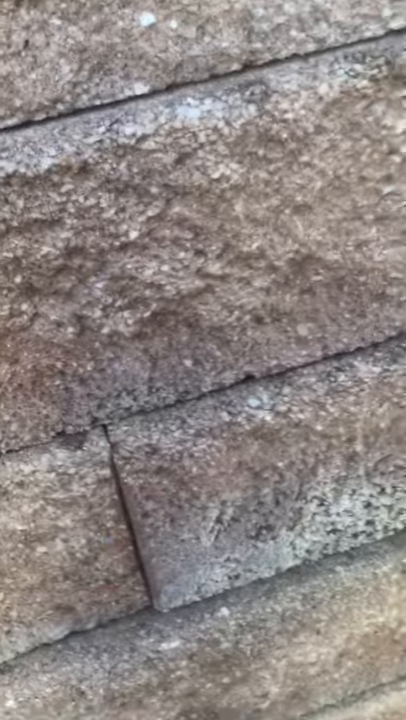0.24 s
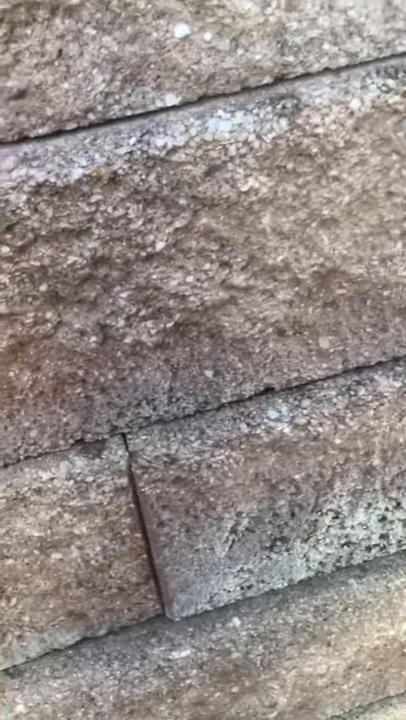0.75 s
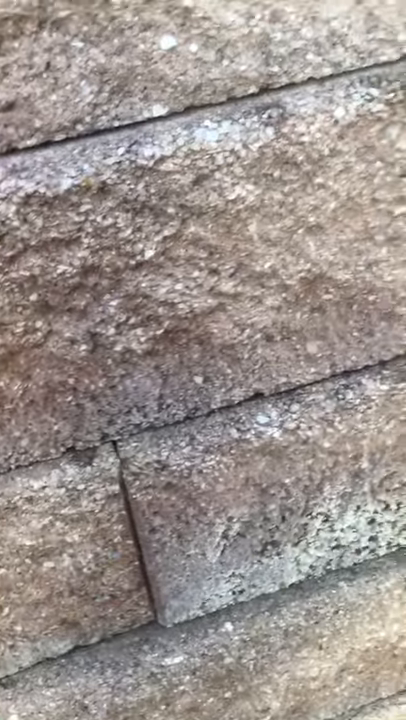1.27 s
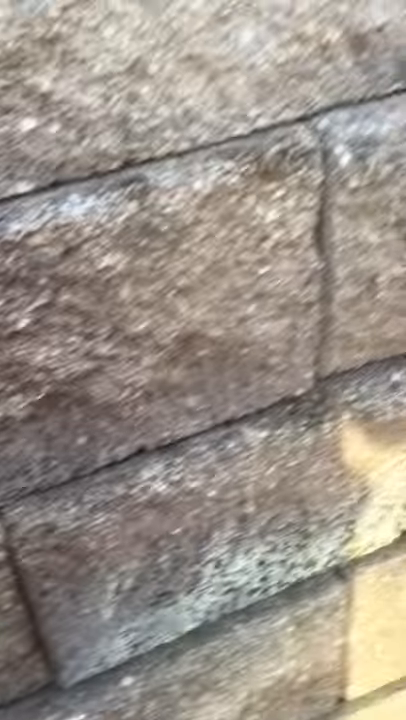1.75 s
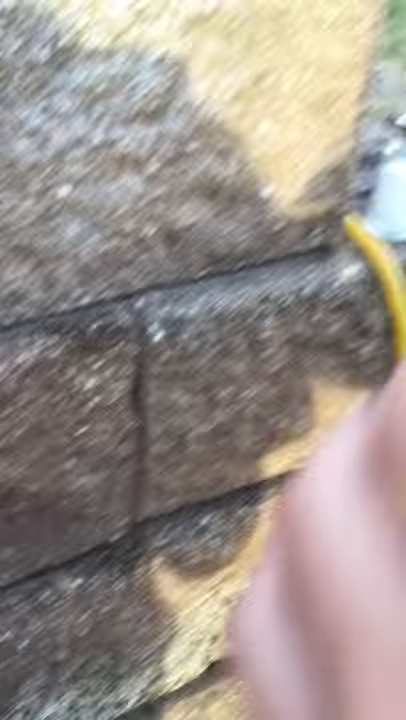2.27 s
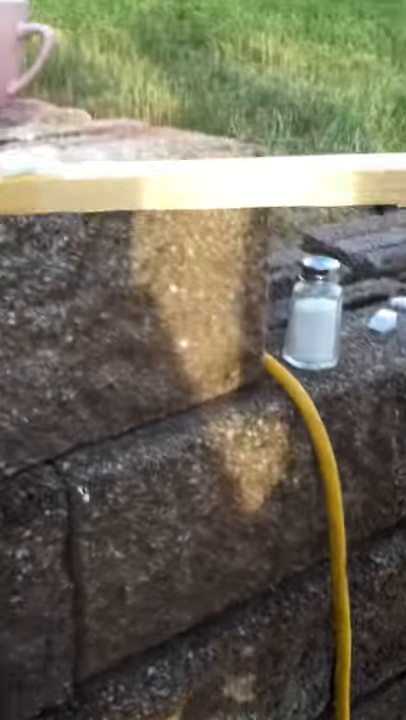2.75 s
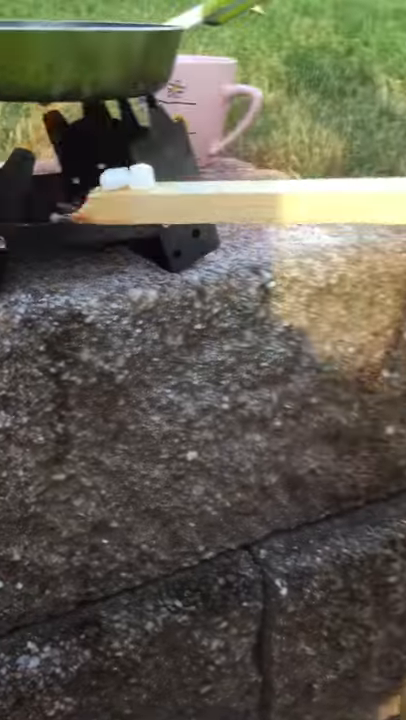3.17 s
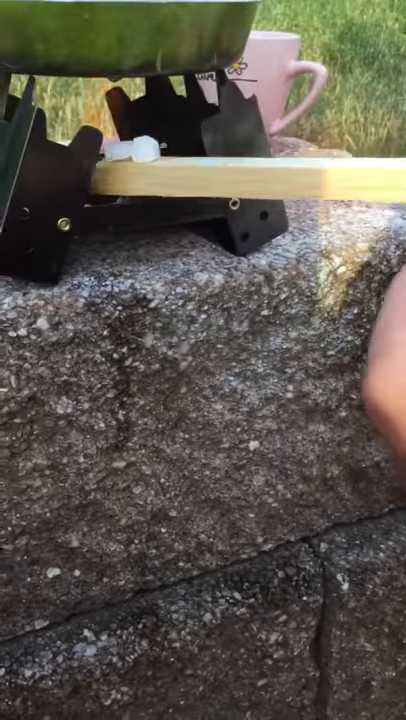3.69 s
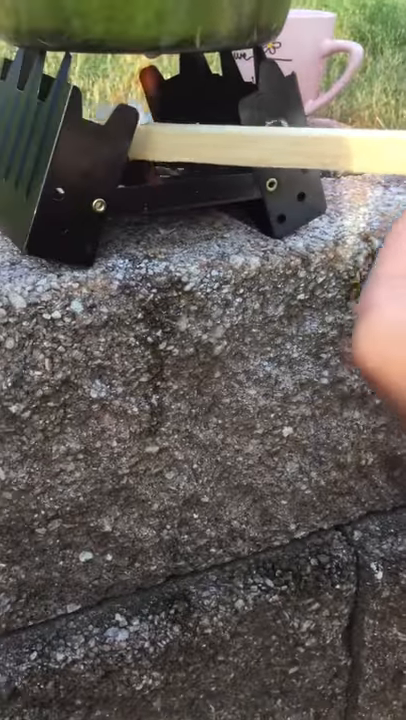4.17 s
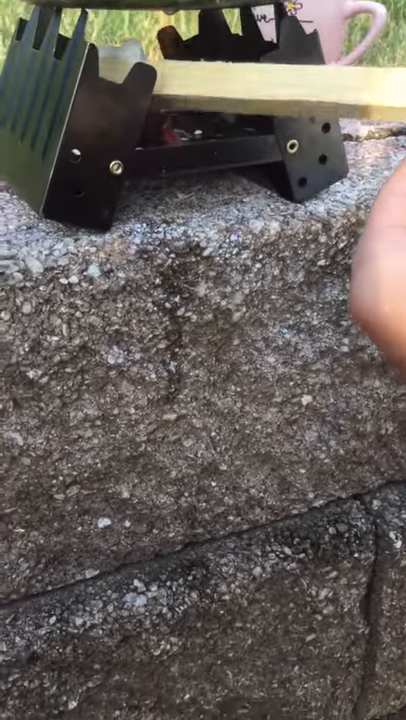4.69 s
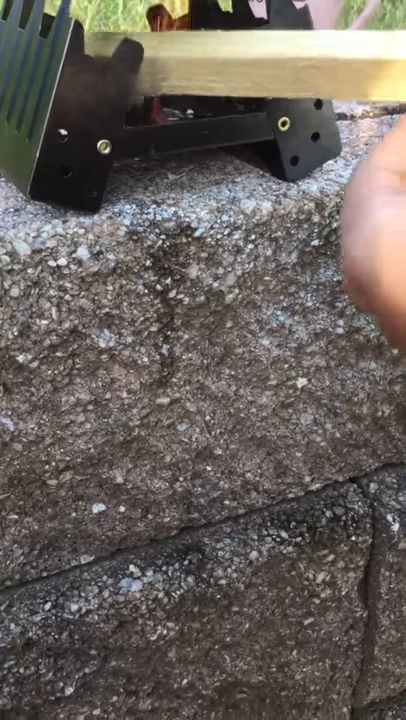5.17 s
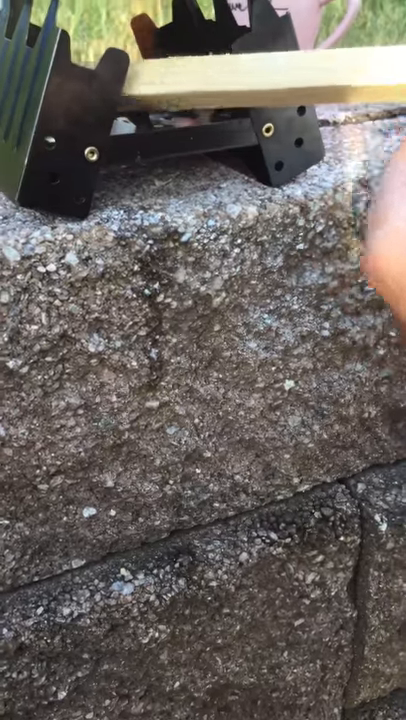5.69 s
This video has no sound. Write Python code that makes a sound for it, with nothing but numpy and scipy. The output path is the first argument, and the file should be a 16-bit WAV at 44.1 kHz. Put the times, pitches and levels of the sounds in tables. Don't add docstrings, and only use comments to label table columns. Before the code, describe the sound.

A quiet garden picked up by a phone, thin in the bass and with its faint treble muted. A soft, low rumble of far traffic continues throughout, with a very faint whine near 1.3 kHz that weakens after 2.5 s. In the first two seconds there are only tiny dry ticks and faint, drawn-out bird whistles and pips; clearer bird notes come around 1.5 and 2 to 2.6 s. At 2.66 s one sharp, short click stands out, followed by small ticks. From 3.8 to 4.3 s a wooden stick lightly scrapes and taps thin sheet steel, while a bird gives several high falling chips at 4.1 to 4.4 s. After a lull, the loudest event comes at 5.24 to 5.36 s: a rapid clatter of bright, short-ringing steel knocks. Brief rubbing and weaker taps follow until 5.7 s, then tiny high ticks at 5.8 s end the quiet scene.

```python
import sys
import numpy as np
from scipy import signal
from scipy.fft import rfft, irfft
from scipy.io import wavfile
from scipy.ndimage import uniform_filter1d

SR = 44100
rng = np.random.default_rng(int(sys.argv[2]) if len(sys.argv) > 2 else 0)


def ratio(d):
    e = np.asarray(d, float) / 20
    return 10 ** e


def store_pcm(level_fs):
    pcm = np.round(np.clip(level_fs, -1, 1) * 32767).astype(np.int16)
    wavfile.write(sys.argv[1], SR, np.atleast_2d(pcm).T)


N = 261513

# t/s, level/dB
WASH_LEVEL = [(0, -73), (.35, -67), (.8, -71.5), (1.5, -70.5), (2.2, -71.5), (2.55, -66.5), (2.95, -69),
              (3.75, -69.5), (4.5, -70.5), (5.2, -73), (5.93, -69.5)]
# f/Hz, level/dB per Hz
RUMBLE_SPECTRUM = [(15, -68), (25, -56), (64, -34), (73, -29), (87, -14), (134, -7), (190, -1), (289, -7.5),
                   (409, -24.5), (480, -20.5), (620, -57.5), (1060, -120)]
WASH_SPECTRUM = [(300, -4), (480, -15), (628, -11), (867, -18), (1320, -19), (1600, -25), (2300, -38.5),
                 (4000, -46), (15000, -58)]
# t/s, level/dB
WHINE_LEVEL = [
    (0, -74),
    (2.2, -75),
    (2.7, -82),
    (5.93, -82),
]
RUMBLE_DB, WHINE_HZ = -52.5, 1280

# t/s, first f/Hz, last f/Hz, level/dB
CHIPS = [
    (2.061, 3066, 1976, -67),
    (3.717, 3600, 3270, -82),
    (4.13, 4470, 3450, -65.5),
    (4.129, 3250, 2540, -71.5),
    (4.249, 4330, 3470, -62.5),
    (4.361, 4370, 3190, -64.5),
    (4.368, 5400, 4500, -81),
    (4.807, 3650, 3240, -74),
    (4.84, 3130, 2970, -86),
    (4.893, 2360, 2320, -86),
]
# t/s, first f/Hz, last f/Hz, level/dB
PIPS = [(.6, 3390, 3290, -84), (1.434, 2480, 2660, -72), (1.53, 3330, 3080, -81.5),
        (1.974, 2330, 2280, -73), (2.148, 1910, 2100, -77), (2.177, 2460, 2500, -70.5),
        (2.572, 2420, 2710, -71), (2.62, 2030, 2400, -71), (4.266, 2370, 2186, -70.5),
        (4.56, 2850, 3470, -78.5), (4.775, 2090, 2120, -86.5), (5.003, 2210, 2215, -87)]
# t/s, length/s, first f/Hz, last f/Hz, level/dB
WHISTLES = [(0, .12, 3030, 3000, -82), (.013, 0.18, 2530, 2390, -86), (.33, 0.14, 2700, 2880, -84.5),
            (0.436, 0.12, 3510, 3250, -82.5), (0.466, 0.12, 2490, 2180, -74.5),
            (.348, 0.13, 5480, 5500, -88), (0.366, .14, 3990, 4090, -89), (.554, 0.11, 5560, 5460, -90.5),
            (.364, 0.16, 8040, 7630, -96.5), (.6, .14, 2380, 2070, -89), (1.999, 0.1, 2710, 2683, -70.5),
            (2.762, 0.037, 2250, 2104, -70), (0.428, 0.11, 4200, 4000, -90), (0.342, 0.06, 6600, 6700, -92),
            (2.361, 0.11, 2680, 2600, -87), (3.36, .065, 3200, 3450, -79), (3.72, 0.087, 1900, 1980, -84.5),
            (4.411, 0.076, 2320, 2420, -82), (4.477, 0.15, 2570, 2980, -85.5),
            (4.659, 0.095, 3000, 2840, -83.5), (4.719, 0.16, 2530, 2404, -79.5),
            (5.019, .093, 3060, 2570, -88)]
# t/s, end f/Hz, top f/Hz, level/dB
ARCHES = [
    (0.383, 2690, 2890, -79.5),
    (1.467, 2040, 2490, -72),
    (2.225, 2700, 2790, -89),
]
CHIP_S, PIP_S, ARCH_S = .038, .044, 0.19

# t/s, peak level/dB, lowest f/Hz, highest f/Hz, t60/s
TICKS = [(.027, -57, 12600, 16200, 0.03), (0.264, -62, 8500, 16000, 0.022), (.405, -63, 9500, 11200, 0.029),
         (0.566, -56.5, 11200, 16200, 0.023), (1.743, -65, 1510, 9400, 0.15), (2.0, -60, 5040, 14000, .02),
         (2.394, -63, 1600, 5900, 0.077), (2.532, -57.5, 1780, 4900, 0.042),
         (2.595, -47, 8100, 16000, 0.03), (2.6603, -26.5, 1830, 10900, 0.031),
         (2.929, -47.5, 4360, 15500, 0.043), (3.038, -62.5, 10500, 16000, 0.042),
         (3.295, -64.5, 3500, 7800, 0.13), (3.41, -60, 4000, 16200, 0.038),
         (3.551, -58.5, 7000, 16000, 0.038), (3.572, -55, 9800, 15800, 0.019),
         (5.225, -40, 2490, 12000, 0.027), (5.74, -58, 10700, 16000, 0.026),
         (5.777, -57.5, 11300, 16000, 0.023), (5.789, -47, 11000, 15700, 0.026),
         (5.815, -50, 330, 480, 0.089), (5.826, -48, 11900, 15900, 0.019),
         (5.812, -53, 11600, 15900, 0.018)]
# t/s, length/s, level/dB, bright share over dull/dB
RUBS = [(2.567, .03, -76.5, 1), (2.657, .004, -58.5, -3), (2.687, 0.088, -85, 22),
        (3.831, 0.013, -54.5, 5.5), (3.916, 0.017, -60.5, 7.5), (3.964, 0.046, -67, 5),
        (2.39, 0.075, -90, -15), (2.52, 0.043, -79, -8), (4.115, .03, -72, 3.5), (4.159, 0.012, -57.5, 2),
        (4.244, .045, -65, -6), (5.099, 0.047, -65.5, 2.5), (5.203, 0.027, -70, 3.5),
        (5.399, 0.058, -54, -1.5), (5.482, 0.036, -53, -5), (5.678, 0.0089, -61.5, 1),
        (5.706, 0.017, -65.5, -1), (5.863, 0.012, -76, 6), (5.9, 0.034, -92, 17)]
RUB_RISE_DB_PER_S, RUB_FALL_DB_PER_S = 905, 399.5

# f/Hz, level/dB, t60/s
STEEL_MODES = [(567, -33, 0.18), (1205, -23.5, 0.28), (1338, -6.5, 0.15), (1587, 2.5, 0.13),
               (1790, -24.5, 0.055), (2370, -13, 0.07), (2200, -1, 0.17), (2204, -17, 0.12),
               (2390, -9.5, 0.17), (2732, 0.5, 0.094), (3105, -2.5, 0.091), (3500, 0, 0.043),
               (3499, -6.5, 0.27), (3770, -5, 0.22), (4110, -7.5, 0.15), (4380, -11.5, 0.21),
               (4860, -1, 0.11), (5493, -6, 0.14), (6450, -22.5, 0.082), (7450, -14, 0.19),
               (6660, -2.5, 0.19), (7290, -3, 0.3), (7990, -7, 0.25), (8660, -4, 0.36), (9170, -4.5, 0.064),
               (10200, -15, 0.27), (11350, -21.5, 0.042), (11420, -12.5, 0.18), (12540, -20, 0.049),
               (13820, -17.5, 0.072)]
# t/s, level/dB, hardness as tilt to the high modes/dB, ring share/1
EDGE_KNOCKS = [(3.8224, -57.5, 8.5, 1), (3.8513, -51, 3, 1), (3.929, -52.5, 3.5, 1), (4.0108, -60, 7, 1),
               (4.1484, -65, 4, 0.9), (4.1612, -51.5, 8, 0.98), (4.2994, -55.5, 4, 0.59),
               (5.1033, -61.5, 12.5, 1), (5.2398, -20.5, 2.8, 0.5), (5.3542, -24.5, 6.5, 0.58),
               (5.5124, -49, -8, 1), (5.7064, -51.5, 5.5, 0.6), (5.85, -65.5, 16.5, 1),
               (5.884, -60.5, 2.5, 0.6)]
# t/s, level/dB, hardness/dB, ring share/1
FACE_KNOCKS = [(.027, -88.5, 15.5, 0.5), (.567, -83.5, 18, 0.32), (.841, -77.5, 16, 1.2),
               (2.087, -97, 19.5, 1), (5.2431, -34.5, -1.1, 1), (5.2736, -35, 0.6, 1),
               (5.3092, -38.5, 1.8, 1), (5.3584, -34, 4.5, 1), (5.4264, -50.5, 6.5, 0.9),
               (5.435, -44.5, 1.3, 1), (5.4834, -51.5, -6, .88), (5.677, -55.5, -0.5, 0.62)]
EDGE_MIDDLE_DB, FACE_MIDDLE_DB = 8.5, -3
SMALL_MODES_DB = 3.5

# f/Hz, level/dB per Hz
GATE_THRESHOLD = [(1200, -120), (1500, -108), (1900, -107), (3000, -111), (6000, -116), (15000, -121)]
HISS_DB = -92.5


def at_hz(points, hz):
    table_hz, value = np.transpose(points)
    return np.interp(np.log(hz), np.log(table_hz), value)


def in_time(rows):
    s, level = np.transpose(rows)
    return np.interp(np.arange(N) / SR, s, level)


def rms_one(x):
    return x / np.sqrt(np.mean(x ** 2) + 1e-20)


def band(x, low_hz, high_hz):
    sos = signal.butter(2, [low_hz, min(high_hz, .45 * SR)], "band", fs=SR, output="sos")
    return signal.sosfilt(sos, x)


def coloured(spectrum):
    hz = np.arange(N // 2 + 1) * SR / N + 1
    closed = [(spectrum[0][0] / 2, -90)] + list(spectrum) + [(spectrum[-1][0] * 2, -120)]
    white = rfft(rng.standard_normal(N))
    return rms_one(irfft(white * ratio(at_hz(closed, hz)), N))


def ring(clicks, hz, t60):
    r, w = ratio(-60 / (t60 * SR)), 2 * np.pi * hz / SR
    return signal.lfilter([0, np.sin(w)], [1, -2 * r * np.cos(w), r * r], clicks + 1e-18)


def far_traffic():
    rumble = ratio(RUMBLE_DB) * coloured(RUMBLE_SPECTRUM)
    wash = ratio(in_time(WASH_LEVEL) + 6) * coloured(WASH_SPECTRUM)
    whine = rms_one(ring(rng.standard_normal(N), WHINE_HZ, .5))
    return rumble + wash + ratio(in_time(WHINE_LEVEL)) * whine


def notes():
    straight = [(s, CHIP_S, *rest) for s, *rest in CHIPS]
    straight += [(s, PIP_S, *rest) for s, *rest in PIPS]
    straight += list(WHISTLES)
    glides = [(s, length, first, (first + last) / 2, last, db) for s, length, first, last, db in straight]
    arches = [(s, ARCH_S, end, top, end, db) for s, end, top, db in ARCHES]
    return glides + arches


def birds():
    out = np.zeros(N + SR)
    flutter = rms_one(band(rng.standard_normal(N + SR), 12, 70))
    for s, length, *glide_hz, db in notes():
        u = np.linspace(0, 1, int(length * SR))
        hz = np.polyval(np.polyfit([0, .5, 1], glide_hz, deg=2), u)
        i = int(s * SR)
        broken = np.clip((-67 - db) / 16, .1, .8)
        air = 1 - broken + broken * flutter[i:i + len(u)]
        level = ratio(db + 11.5) * np.sin(np.pi * u) ** .5 * air
        out[i:i + len(u)] += level * np.sin(2 * np.pi * np.cumsum(hz) / SR)
    t = np.arange(SR // 4) / SR
    echoes = rng.standard_normal(len(t)) * ratio(-60 * t / 0.3) * (t > .008)
    echoes /= np.sqrt(np.sum(echoes ** 2))
    return out[:N] + ratio(-9.0) * signal.fftconvolve(out, echoes)[:N]


def ticks():
    out, t = np.zeros(N + SR), np.arange(SR // 8) / SR
    noises = rng.standard_normal((len(TICKS), len(t)))
    for (s, db, low_hz, high_hz, t60), noise in zip(TICKS, noises):
        trail = ratio(-27.5 - 60 * t / 1.28)
        fall = (ratio(-60 * t / t60) + trail) * (1 - np.exp(-t / 0.00098))
        out[int(s * SR):][:len(t)] += ratio(db - 8.5) * fall * rms_one(band(noise, low_hz, high_hz))
    return out[:N]


def rub_grains():
    happens = rng.random(N) < 5000 / SR
    slips = ratio(2.3 * rng.exponential(1, N)) * rng.choice([-1, 1], N) * happens
    dull = rms_one(band(slips, 2400, 6800))
    bright = rms_one(band(slips, 7000, 18500))
    s, length, db, bright_db = np.transpose(RUBS)[:, :, None]
    t = np.arange(N) / SR
    rise_db = RUB_RISE_DB_PER_S * np.maximum(s - t, 0)
    fall_db = RUB_FALL_DB_PER_S * np.maximum(t - s - length, 0)
    stroke = ratio(db - rise_db - fall_db)
    return stroke.max(axis=0) * dull + (stroke * ratio(bright_db)).max(axis=0) * bright


def knocks():
    kinds = [(EDGE_KNOCKS, EDGE_MIDDLE_DB), (FACE_KNOCKS, FACE_MIDDLE_DB)]
    return sorted((s, db - middle - hard, db, db - middle + hard, np.clip(share, .2, 1.3))
                  for rows, middle in kinds for s, db, hard, share in rows)


def small_mode_blur(noise, t, zone_db, share):
    blur = 0
    zones = zip(zone_db, [1200, 2800, 6500], [2800, 6500, 15500], [.13, .1, .07])
    for db, low_hz, high_hz, t60 in zones:
        zone = rms_one(band(band(noise, low_hz, high_hz), 1700, 15000))
        blur = blur + ratio(db + 2.0 - 60 * t / (share * t60)) * zone
    return blur


def stove(rub):
    out, t = np.zeros(N + SR), np.arange(SR // 4) / SR
    hz, mode_db, t60 = np.transpose(STEEL_MODES)[:, :, None]
    longest = np.where(hz < 1700, .2, np.where(hz < 6000, .11, .07))
    t60 = np.clip(t60, .04, longest)
    strikes = knocks()
    chance = rng.standard_normal((len(strikes), 2, len(STEEL_MODES), 1))
    rattle = rng.standard_normal((len(strikes), len(t)))
    unevenness = ratio(SMALL_MODES_DB * rng.exponential(1, len(t) // 2 + 1))
    rattle = irfft(rfft(rattle) * unevenness, len(t))
    rise = 1 - np.exp(-t / 0.00094)
    for (s, *zone_db, share), (luck, phase), noise in zip(strikes, chance, rattle):
        zones = list(zip([1800, 4300, 10000], zone_db))
        gains = ratio(at_hz(zones, hz) + 0.83 * mode_db + 4.5 * luck - 6.5)
        first_panel = np.sin(2 * np.pi * (hz * t + phase))
        twin_panel = 1.57 * np.sin(2 * np.pi * hz * (1 + .008 * phase) * t)
        decay = ratio(-60 * t / (t60 * share))
        modes = np.sum(gains * decay * (first_panel + twin_panel), axis=0)
        blur = small_mode_blur(noise, t, zone_db, share)
        wood = ratio(zone_db[0] - 25 - 60 * t / 0.29) * rms_one(band(noise, 500, 1000))
        out[int(s * SR):][:len(t)] += rise * (modes + blur + wood)
    rung = sum(ratio(0.15 * db) * ring(rub, f, d) for f, db, d in zip(hz[:, 0], mode_db[:, 0], t60[:, 0]))
    return out[:N] + ratio(-41) * rung


def scene():
    rub = rub_grains()
    return (far_traffic() + birds() + ticks() + rub + stove(rub))[None]


def gate(x):
    hz, _, z = signal.stft(x, SR, nperseg=2048, noverlap=1024)
    per_hz = 2 * 2048 / (1.5 * SR)
    wobble = rms_one(uniform_filter1d(rng.standard_normal(z.shape), size=13, axis=0))
    threshold_db = at_hz(GATE_THRESHOLD, hz + 1)[:, None] + 4.5 * wobble
    power = uniform_filter1d(np.abs(z) ** 2, size=5, axis=0)
    over_db = 10 * np.log10(power * per_hz + 1e-20) - threshold_db
    rounding = rng.standard_normal(z.shape) + 1j * rng.standard_normal(z.shape)
    rounding = rounding * ratio(threshold_db - 4.5) / np.sqrt(per_hz)
    gated = (z + rounding) / (1 + ratio(-5 * over_db))
    return signal.istft(gated, SR, nperseg=2048, noverlap=1024)[1][:N]


def band_limit(x):
    return signal.sosfilt(signal.butter(12, 16500, fs=SR, output="sos"), x)


def record(dry):
    hiss = signal.lfilter([1], [1, -.3], rng.standard_normal(dry.shape))
    x = gate(dry[0])[None] + ratio(HISS_DB) * hiss
    x = signal.sosfilt(signal.cheby2(12, 60, 16500, fs=SR, output="sos"), x)
    return band_limit(x)


dry = scene()
out = record(dry)
store_pcm(out)
```